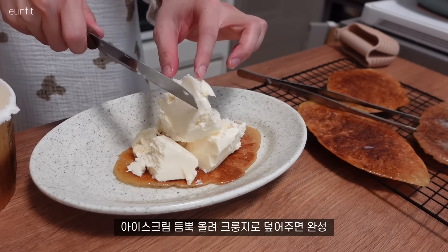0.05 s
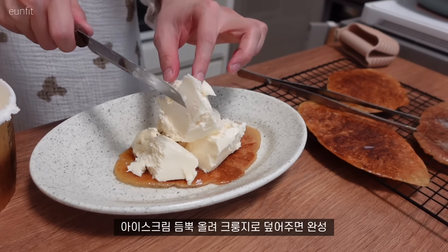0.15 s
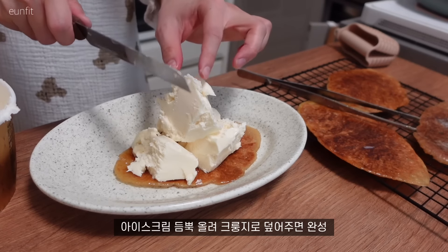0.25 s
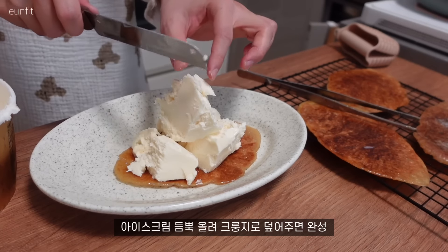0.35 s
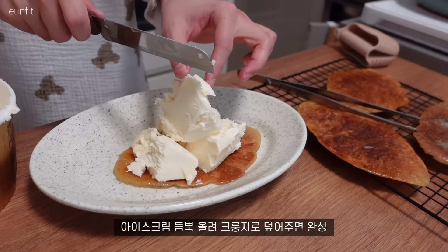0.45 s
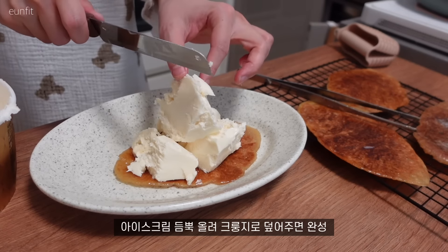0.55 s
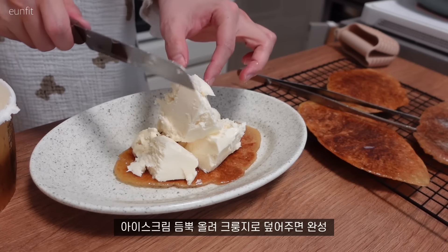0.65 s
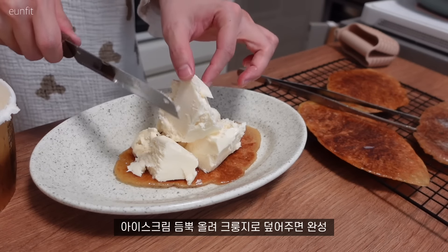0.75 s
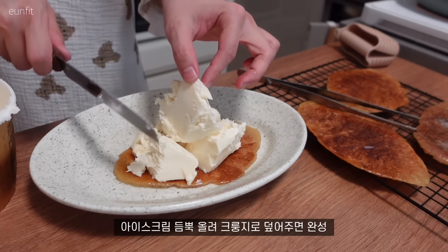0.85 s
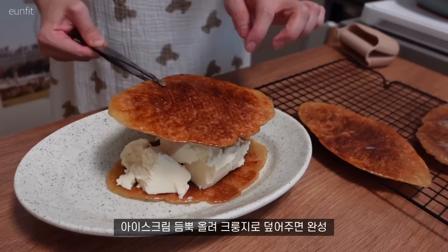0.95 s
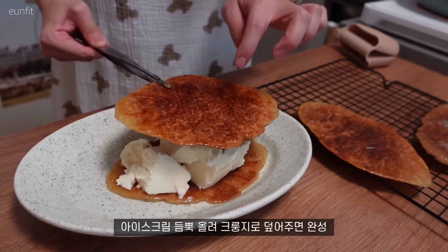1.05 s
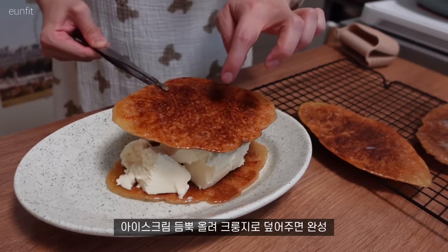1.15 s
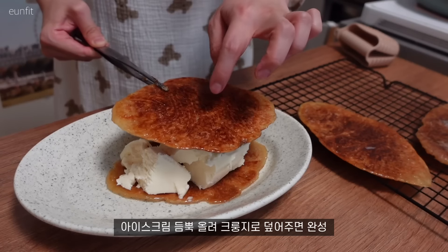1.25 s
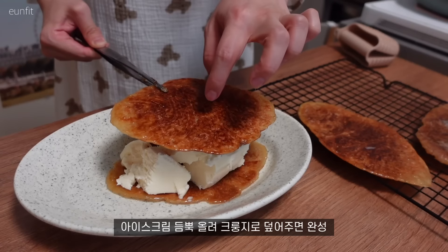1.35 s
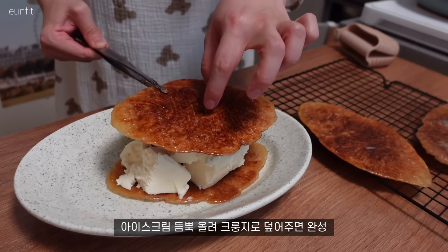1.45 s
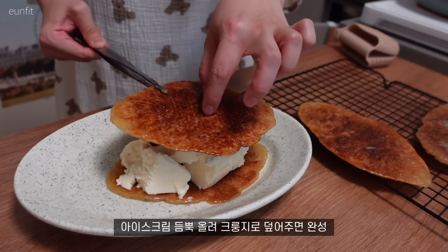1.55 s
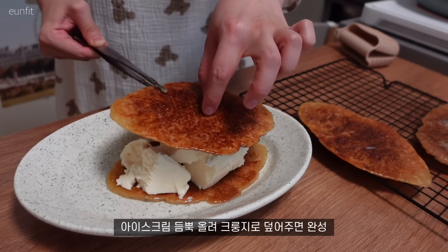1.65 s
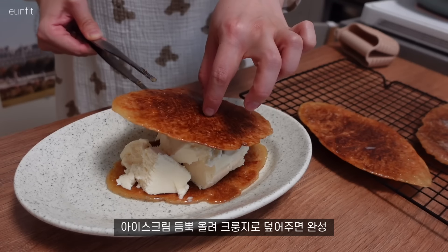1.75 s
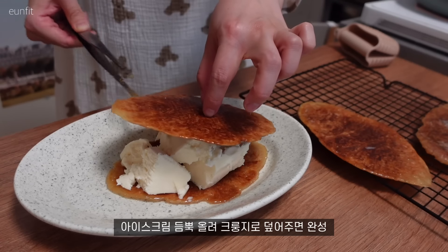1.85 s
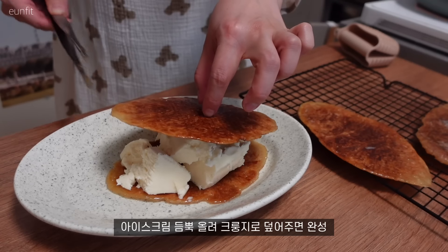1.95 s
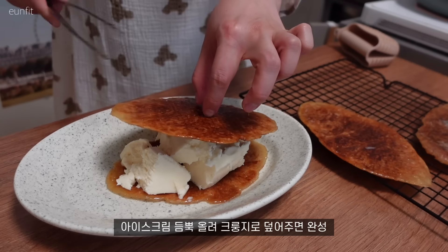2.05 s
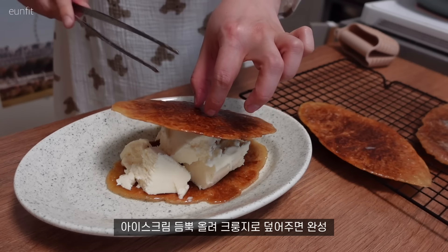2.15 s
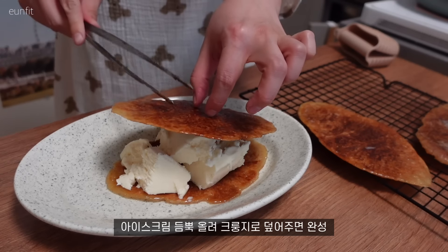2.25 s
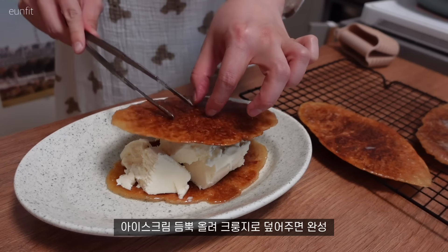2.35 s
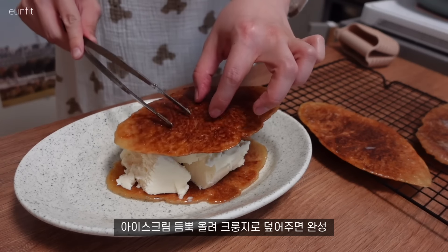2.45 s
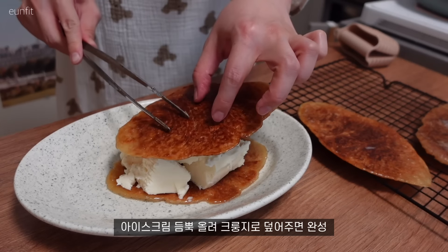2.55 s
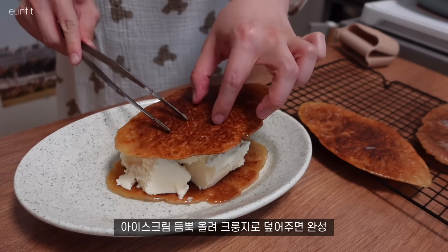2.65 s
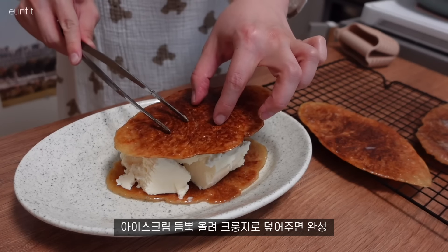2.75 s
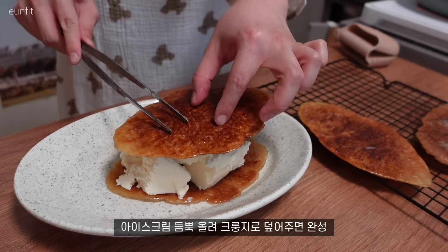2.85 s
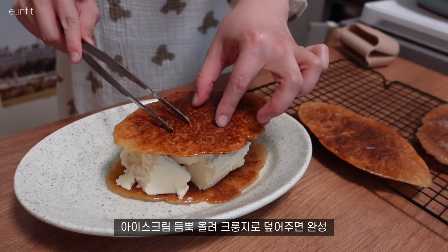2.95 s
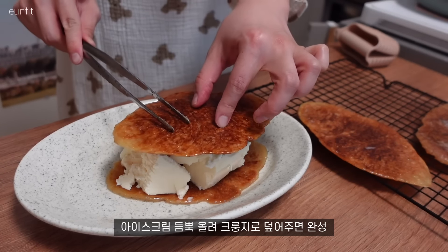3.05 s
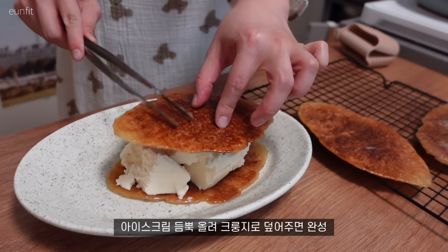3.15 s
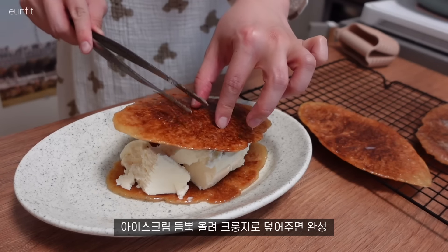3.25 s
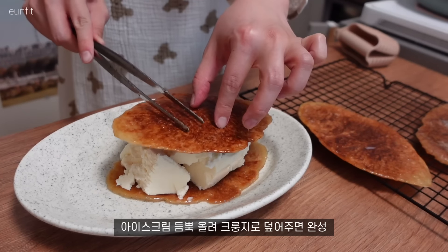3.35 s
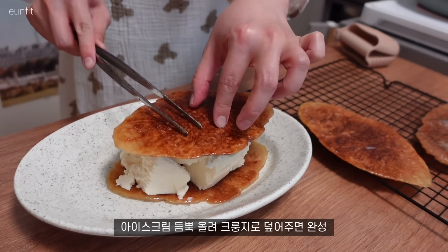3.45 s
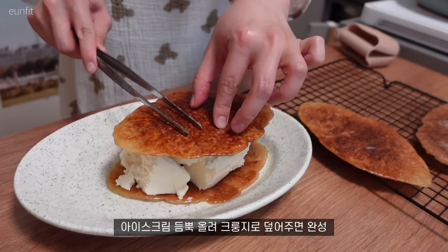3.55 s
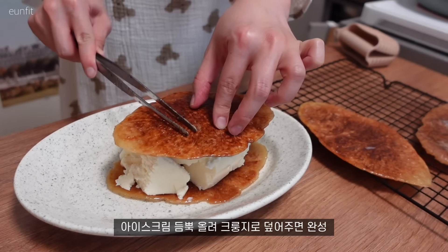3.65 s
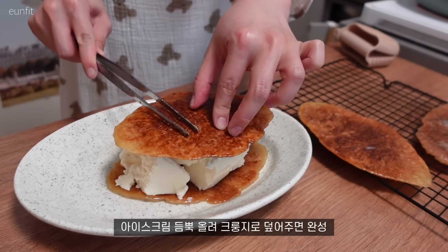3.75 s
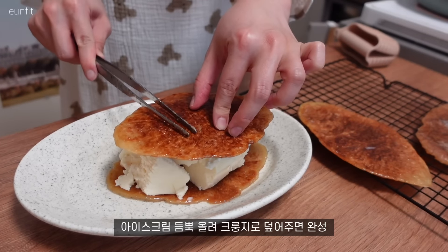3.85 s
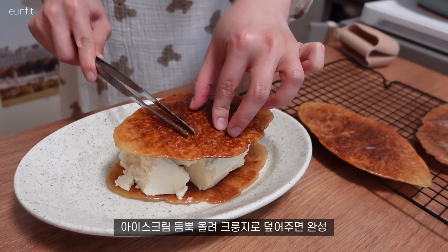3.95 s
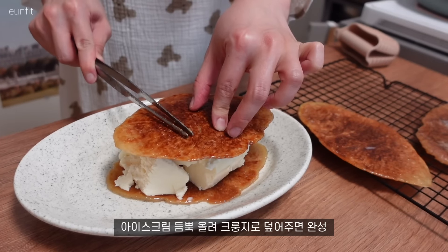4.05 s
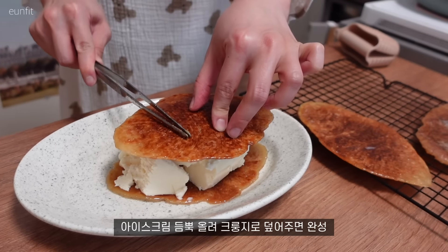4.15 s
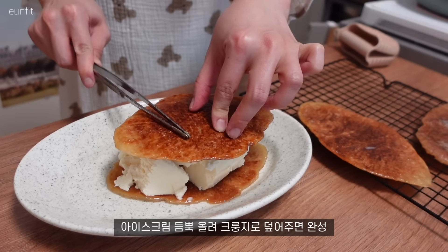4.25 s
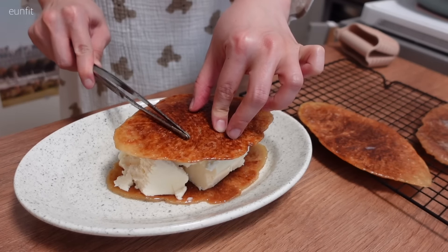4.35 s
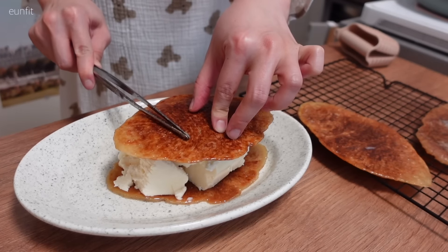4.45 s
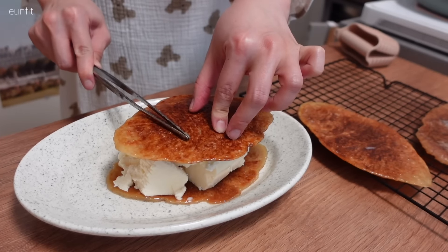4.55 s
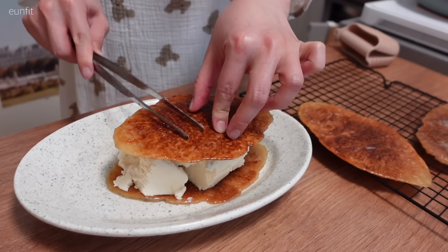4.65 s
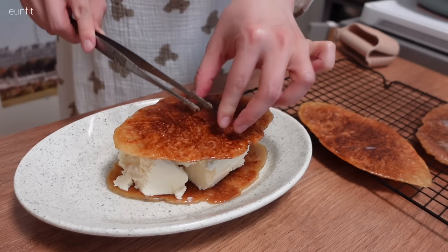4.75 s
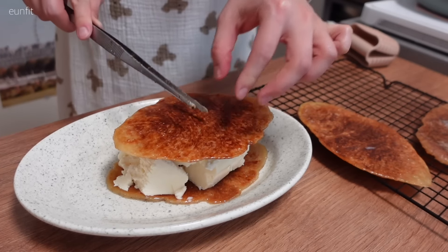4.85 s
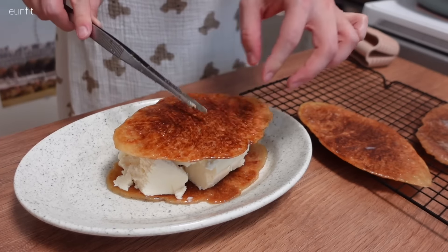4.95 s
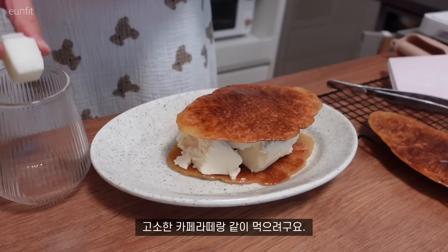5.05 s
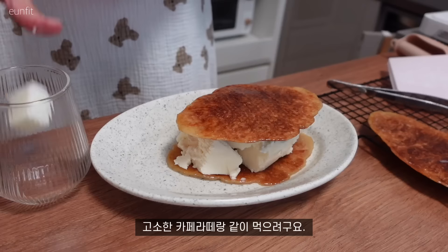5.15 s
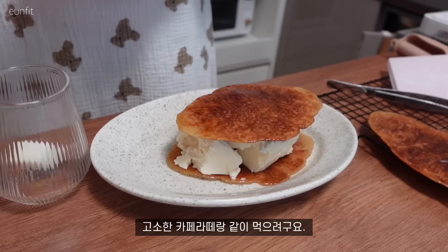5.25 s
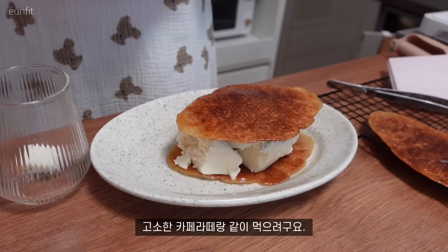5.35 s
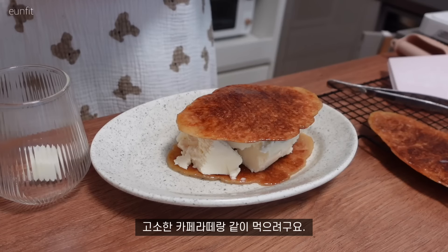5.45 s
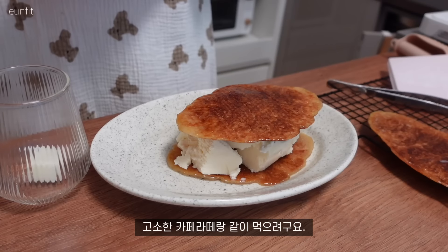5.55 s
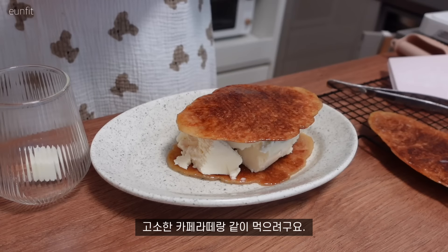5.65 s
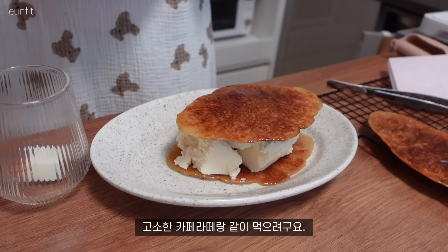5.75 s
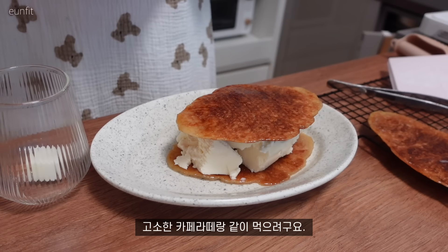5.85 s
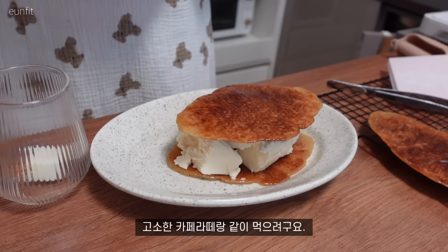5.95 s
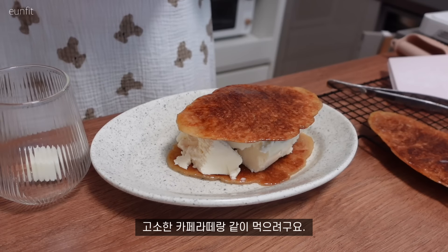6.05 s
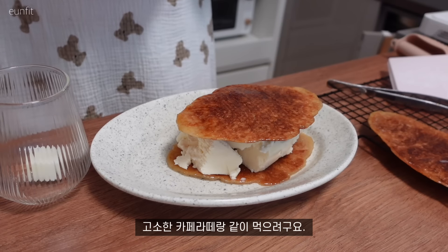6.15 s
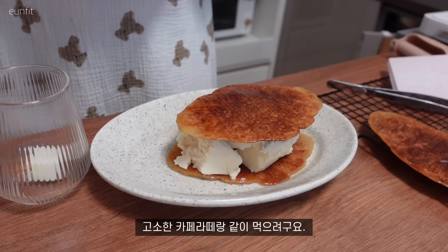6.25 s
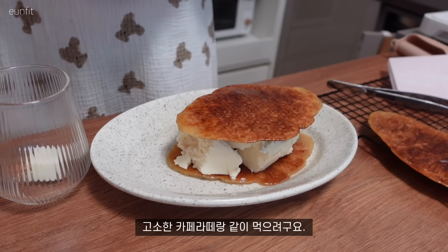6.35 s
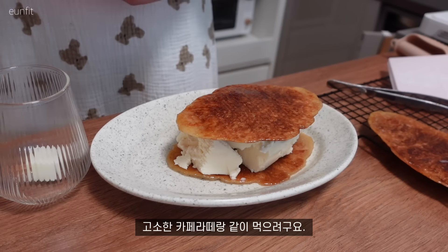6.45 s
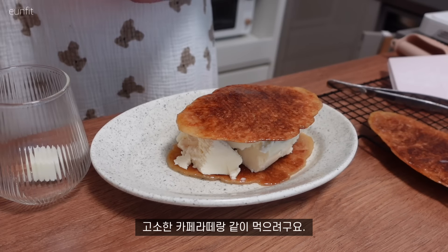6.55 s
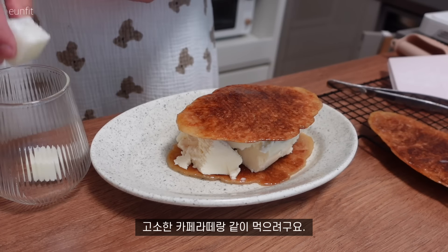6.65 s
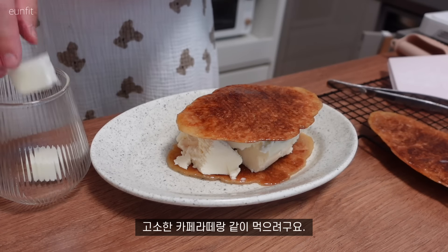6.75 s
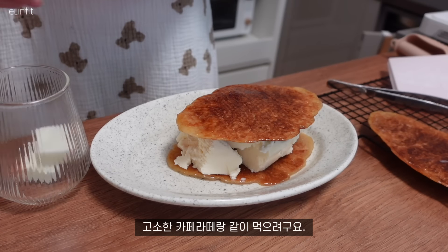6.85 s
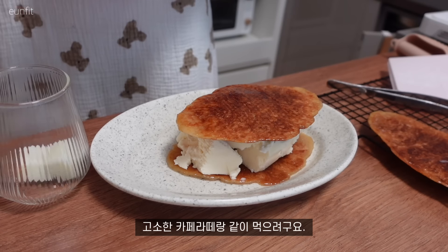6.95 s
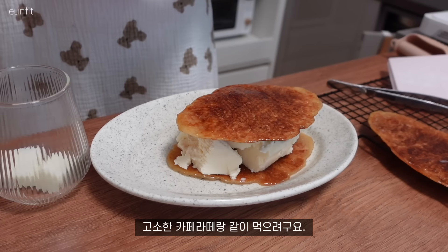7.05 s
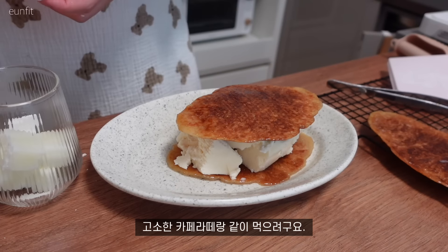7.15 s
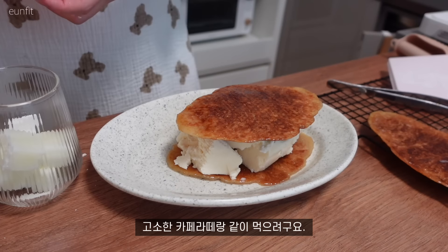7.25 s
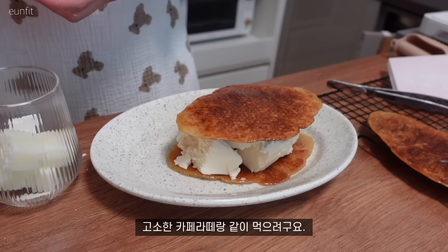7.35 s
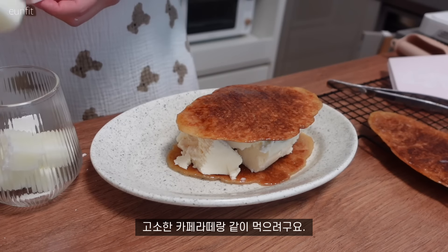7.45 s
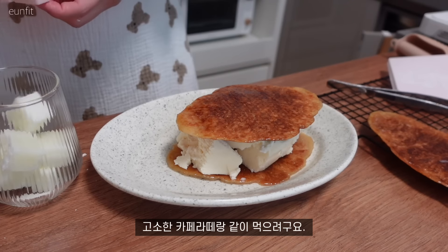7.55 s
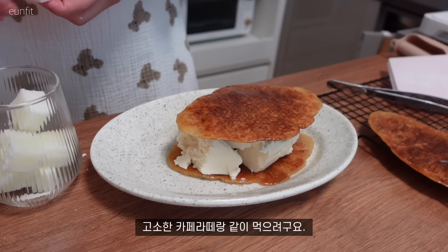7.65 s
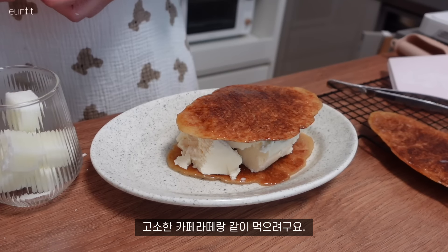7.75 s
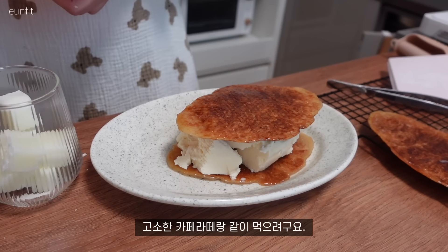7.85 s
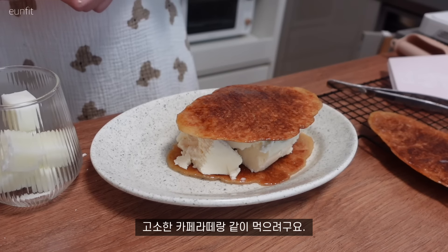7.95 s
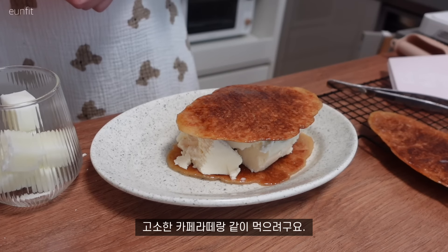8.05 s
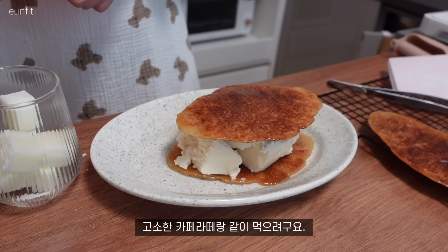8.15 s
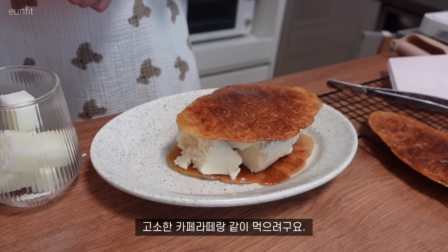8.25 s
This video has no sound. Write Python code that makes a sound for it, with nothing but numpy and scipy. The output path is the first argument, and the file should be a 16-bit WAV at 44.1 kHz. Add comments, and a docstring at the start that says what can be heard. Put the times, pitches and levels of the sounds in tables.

```python
"""First comes the low, steady noise of a small kitchen, and hands rubbing softly. Tongs and fingers tap
a crisp pastry lid and press it onto ice cream; its crust crackles as flakes break. Then three frozen
cubes are prised from a creaking tray and dropped into a thin glass on a wooden table. Each blow knocks
the table and rings the glass; a limiter squashes the hardest, so the room swells up behind them.
Just before the third cube, the ringing stops dead."""
import sys
import numpy as np
from scipy import signal
from scipy.fft import rfft, irfft, next_fast_len
from scipy.io import wavfile
from scipy.ndimage import uniform_filter1d

SR = 44100
rng = np.random.default_rng(int(sys.argv[2]) if len(sys.argv) > 2 else 0)


def waveform_to_disk(signal):
    """Save audio, clipped to [-1, 1], as 16-bit WAV at the path in sys.argv[1]."""
    frames = np.transpose(np.atleast_2d(signal))
    scaled = np.clip(frames, -1, 1) * 32767
    samples = np.round(scaled).astype(np.int16)
    wavfile.write(sys.argv[1], SR, samples)


N = 366030
FREQS = np.fft.rfftfreq(2048, 1 / SR) + 1  # a click's "colour" is its strength at each of these, in Hz


def amp(db):
    """Turns decibels into a gain; the levels in the tables are all relative."""
    return 10 ** (np.asarray(db) / 20)


def unit(x):
    """Scales a signal to an average power of 1."""
    return x / np.sqrt(np.mean(x ** 2) + 1e-20)


def read(points, hz):
    """Reads between the rows of a (frequency, value) table, on a pitch scale."""
    f, value = np.transpose(points)
    return np.interp(np.log(hz + 1), np.log(f + 1), value)


def add(mix, s, sound):
    """Mixes a sound in, starting at s seconds."""
    part = mix[max(round(s * SR), 0):][:len(sound)]
    part += sound[:len(part)]


def hump(hz, centre_hz, octaves):
    """A resonance: strongest at its centre, fading gently to both sides."""
    return (1 + (np.log2((hz + 1) / centre_hz) / octaves) ** 2 / 4) ** -3


def noise(colour, size):
    """Noise whose strength at each frequency follows the function colour(hz)."""
    white = rfft(rng.standard_normal(size))
    return unit(irfft(white * colour(np.fft.rfftfreq(size, 1 / SR)), size))


def click(colour, grit, grit_s):
    """A sudden pulse of the given colour, trailed by tiny fractures (the grit)."""
    log_gain = np.log(np.maximum(colour / colour.max(), 1e-5))
    mirrored = np.r_[log_gain, log_gain[-2:0:-1]]
    pulse = np.fft.ifft(np.exp(np.conj(signal.hilbert(mirrored)))).real  # packs the energy at the start
    fractures = rng.standard_normal(len(pulse)) * np.exp(-np.arange(len(pulse)) / SR / grit_s)
    pulse = pulse + grit * signal.fftconvolve(pulse, fractures / np.linalg.norm(fractures))[:len(pulse)]
    return pulse / np.linalg.norm(pulse) * np.sqrt(.002 * SR)  # the energy of 2 ms at power 1


# the steady noise of the room: f/Hz, level/dB
ROOM_NOISE = [(15, -67.5), (25, -35.5), (102, -15), (161, -4), (229, -7), (256, -4.5), (354, -6.5),
              (591, -17), (641, -16.5), (988, -21), (1260, -19.5), (1400, -21), (1790, -22.5), (6210, -33),
              (16000, -34)]
# how much left and right differ, next to what they share: f/Hz, level/dB
ROOM_WIDTH = [(60, -5), (150, -9), (380, -8.5), (950, -4.5), (2380, -6), (5980, -7), (15000, -25)]
def room_noise(level_db=-59.5):
    """A low, steady noise under a faint hiss."""
    mid, side = (noise(lambda hz: amp(read(ROOM_NOISE, hz)), N) for _ in range(2))
    width = amp(read(ROOM_WIDTH, np.fft.rfftfreq(N, 1 / SR)))
    side = irfft(rfft(side) * width, N)
    return amp(level_db) * (mid + np.array([side, -side]))


# hands rubbing and shifting: middle t/s, quarter of the length t/s, level/dB, centre f/Hz
RUBS = [(1.15, 0.16, -66.5, 1390), (1.122, .13, -74.5, 6500), (1.14, 0.039, -53.5, 117.5),
        (1.858, 0.037, -52, 810), (2.615, 0.07, -63.5, 1770), (3.659, 0.061, -62, 3100),
        (4.72, 0.042, -53.5, 3900), (5.908, 0.17, -63.5, 1554), (6.201, 0.045, -55.5, 2430),
        (6.465, 0.21, -62, 1470), (7.25, 0.13, -62, 1750)]
def hands(grain_db=3.5):
    """Each movement is a swell of grainy friction."""
    out = np.zeros(N)
    for s, quarter, db, centre_hz in RUBS:
        size = next_fast_len(int(4 * quarter * SR))
        grains = amp(grain_db * unit(uniform_filter1d(rng.standard_normal(size), size=150)))
        rub = unit(grains * noise(lambda hz: hump(hz, centre_hz, octaves=0.99), size))
        add(out, s - 2 * quarter, amp(db) * rub * np.hanning(size))
    return out


# how long the kitchen takes to fade by 60 dB: f/Hz, t/s
ROOM_FADE = [(150, 0.36), (500, 0.41), (1400, 0.52), (3500, 0.4), (8000, 0.44), (15000, 0.22)]
# echoes off nearby surfaces: delay t/s, gain
ECHOES = [(.0009, 0.058), (.0034, 0.15), (0.0172, 0.1), (0.0155, 0.057), (.0185, .14), (0.031, 0.39)]
def kitchen(x, wet_db, side_db, build_s=0.0059, apart_hz=600):
    """Adds a few early echoes and a smooth tail; left and right differ mainly in its treble."""
    hz, t, spectra = signal.stft(rng.standard_normal((2, 32768)), SR, nperseg=256)
    decay = amp(-60 * t / read(ROOM_FADE, hz)[:, None])
    tails = signal.istft(spectra * decay, SR, nperseg=256)[1]
    tails *= 1 - np.exp(-(np.arange(tails.shape[1]) / SR / build_s) ** 2)
    mid, side = amp(wet_db) * tails / np.linalg.norm(tails[0])
    side = signal.sosfilt(signal.butter(1, apart_hz, "high", fs=SR, output="sos"), side)
    mid[0] += 1  # the direct sound
    for delay, gain in ECHOES:
        mid[round(delay * SR)] += gain * amp(wet_db)
    response = mid + amp(side_db) * np.array([side, -side])
    return signal.fftconvolve(x[None], response, axes=1)[:, :N]


def contact(hz, hardness_hz, slope=1.966):
    """A soft contact lasts longer, so it makes less treble."""
    return 1 / np.sqrt(1 + (hz / hardness_hz) ** (2 * slope))


def snaps(rows, body, level_db, grit, grit_s, crumb_db, crumb_s, edge=0.058, crumbs=4, ripple_db=1.5):
    """Brittle clicks that do not ring, each followed by a few much smaller fractures."""
    out = np.zeros(N)
    for s, db, hz, octaves in rows:
        # each spot has its own hollow resonances
        ripple = np.c_[np.geomspace(500, 16000, 26), rng.standard_normal(26)]
        colour = hump(FREQS, hz, octaves) * amp(read(body, FREQS) + ripple_db * read(ripple, FREQS))
        colour *= contact(edge * hz, FREQS)  # a small piece gives off little sound below edge * hz
        add(out, s, amp(db + level_db) * click(colour, grit, grit_s))
        for lag, size in rng.standard_normal((crumbs, 2)):
            crumb = amp(db + crumb_db + 0.91 * size) * click(colour, grit, grit_s)
            add(out, s + crumb_s * (1 + 0.17 * lag), crumb)
    return out


# taps on the lid: t/s, level/dB, centre f/Hz, spread/octaves
TAPS = [(1.8452, -44, 750, 1.4), (1.8804, -40, 1190, 1.63), (2.347, -35.5, 1280, 0.93),
        (2.869, -53, 1730, 1.6), (3.3679, -36.5, 1390, 0.78)]
# the tone of the lid on its plate: f/Hz, level/dB
LID_TONE = [(400, -8), (680, 2.5), (950, 1), (1500, 2.5), (2100, -4), (2900, 1), (4300, -5), (6500, 5.5),
            (9000, 2), (16000, 3)]
def lid_taps():
    """Tongs and fingers make dull taps on the pastry."""
    return snaps(TAPS, LID_TONE, level_db=4.0, grit=1.15, grit_s=0.0022, crumb_db=-14.5, crumb_s=.018)


# single cracks: t/s, level/dB, centre f/Hz
CRACKS = [(3.2683, -41.5, 2880), (3.634, -44.5, 2590), (3.656, -45, 6100), (3.8257, -45.5, 4460),
          (3.9282, -44, 6000), (4.1483, -45, 8300), (4.2056, -37, 4430), (4.362, -38, 7000),
          (4.4758, -40, 7000), (4.5, -51, 5600), (4.6246, -45.5, 2200), (4.6699, -43.5, 4830),
          (4.7294, -33.5, 2970), (4.7662, -37, 1970), (4.7751, -31, 11000)]
# runs of small flakes giving way: start t/s, end t/s, level/dB
CRUMBLES = [(3.623, 3.982, -55), (4.492, 4.548, -53), (4.69, 4.755, -45)]
# the tone that all the cracks share: f/Hz, level/dB
FLAKE_TONE = [(500, -9.5), (1400, 3), (2300, 2.5), (3100, 4.5), (4200, -1), (5200, 0.5), (6400, -3.5),
              (7800, 0.5), (10000, -1.5), (13000, 1), (16000, -2.5)]
def crust_cracks(per_run=6, flake_hz=5200, pitch_octaves=0.86, spread_db=6.5, width_octaves=1.5):
    """The crust cracks and sheds flakes at uneven intervals, each with its own loudness and pitch."""
    breaks = list(CRACKS)
    for start, end, db in CRUMBLES:
        for k, (when, size, pitch) in enumerate(rng.uniform(-0.9, 1, (per_run, 3))):
            s = start + (end - start) * (k + .5 + .5 * when) / per_run
            breaks.append((s, db + spread_db * size, flake_hz * 2 ** (pitch_octaves * pitch)))
    rows = [(s, db, hz, width_octaves) for s, db, hz in breaks]
    return snaps(rows, FLAKE_TONE, level_db=2.0, grit=1.2, grit_s=0.0021,
                 crumb_db=-27.5, crumb_s=.016, edge=0.59)


def crust_crunch(start_s=3.58, end_s=4.8, count=60, level_db=-61, spread_db=4.0):
    """Under a firm, steady press, tiny flakes keep giving way."""
    when, pitch = rng.random((2, count))
    levels = level_db + spread_db * np.clip(rng.standard_normal(count), -2, 2)
    out = np.zeros(N)
    for s, db, hz in zip(start_s + (end_s - start_s) * when, levels, 3500 * 3 ** pitch):
        add(out, s, amp(db) * click(hump(FREQS, hz, octaves=0.98), grit=1, grit_s=0.0013))
    return out


def ring(hz, fade_s, gains, size, waver=0, rise_s=0.0011):
    """A struck object's own tones: each falls 60 dB in fade_s and may waver in level and phase."""
    t = np.arange(size) / SR
    steps = rng.standard_normal((len(hz), size // 200 + 2, 2)) @ [1, 1j]
    drift = np.array([np.interp(t * SR / 200, np.arange(len(row)), row) for row in steps])
    tones = np.exp(2j * np.pi * hz[:, None] * t) * amp(-60 * t / fade_s[:, None])
    tones *= 1 + np.reshape(waver, (-1, 1)) * drift
    return gains @ tones * (1 - np.exp(-t / rise_s))


# the tones of the wooden table: f/Hz, fade t/s, level/dB
WOOD_TONES = [(186.2, 0.16, -11.5), (225, 0.062, -19), (273, 0.079, -18.5), (337, 0.098, -18),
              (558, 0.023, -14.5), (629, 0.075, -12), (657, .12, -12), (790, 0.086, -21.5),
              (1430, .05, -19), (1598, 0.22, -22.5), (2141, .03, -7), (2030, 0.053, -23)]
def table_thuds(hardness_hz, level_db=-1):
    """Each blow shakes the table under the glass, giving one short thud."""
    hz, fade_s, db = np.transpose(WOOD_TONES)
    signs = (-1) ** np.arange(len(hz))  # neighbouring tones swing in opposite directions
    return ring(hz, fade_s, signs * amp(db + level_db) * contact(hz, hardness_hz), size=16000).imag


# the tones of the glass: f/Hz, fade t/s, level/dB if hit on the base, level/dB if hit on the wall
GLASS_TONES = [(1279.6, 2.1, -39, -19), (3368, 0.32, -33.5, -10.5), (3388, 0.38, -41, -4),
               (5330, .2, -12.5, -48), (5570, 0.16, -1, -38), (5644, 0.22, -1, -33.5),
               (5595, .2, -7, -35.5), (5860, 0.31, -17, -23), (7240, 0.11, -30.5, -6.5),
               (8300, 0.14, -40, -10.5), (8845, 0.21, -19, -18.5), (10580, 0.22, -10.5, -32),
               (11020, 0.15, -35.5, -16), (11430, 0.16, -45.5, -21.5), (12850, .12, -37.5, -15.5),
               (13260, .21, -24, -20), (13490, 0.17, -24.5, -26), (14200, .12, -29, -18.5),
               (15000, .1, -29, -21.5)]
def glass_tones(base_db, wall_db, tilt_db):
    """Where a cube lands decides which tones sound: gives each blow's ring, rasp gain and colour."""
    hz, fade_s, on_base, on_wall = np.transpose(GLASS_TONES)
    tilt = tilt_db * np.log2(np.maximum(hz, 3400) / 5000)
    base, wall = amp(base_db + on_base + tilt), amp(wall_db + on_wall + tilt)
    waver = 0.35 * np.minimum(hz / 5500, 1) ** 3  # the loose cube disturbs the high tones most
    rings = ring(hz, fade_s, np.hypot(base, wall), size=70000, waver=waver)
    # a cube chatters on the base, smearing the tones into a rasp; it glances off the wall more cleanly
    rasp = np.hypot(base * amp(-7), wall * amp(-14))
    smeared = np.sqrt(rasp ** 2 @ hump(FREQS, hz[:, None], octaves=0.07) ** 2)
    return rings, np.linalg.norm(rasp, axis=1), smeared * (1 - contact(FREQS, 7800))


# the tone of ice hitting glass: f/Hz, level/dB
CLACK_TONE = [(30, -46), (100, -35), (180, -3.5), (470, -5), (680, 6.5), (1000, -2), (1600, 2), (2350, 0),
              (2900, -7), (4000, -4.5), (5300, 3), (8500, 3.5), (12000, -13.5), (16000, -21.5)]
def ice_clack(hardness_hz, level_db=-1):
    """A dry, gritty clack, brighter when the contact is harder."""
    colour = amp(read(CLACK_TONE, FREQS)) * contact(FREQS, hardness_hz)
    return amp(level_db) * click(colour, grit=3.6, grit_s=0.0035)


def struck_glass(blows, phase_rad=0.33):
    """Each blow clacks, thuds and rasps in the room; the ring is a little out of step left and right."""
    knocks, chime = np.zeros(N), np.zeros(N, complex)
    s, knock_db, hardness_hz, base_db, wall_db, tilt_db = np.transpose(blows)[:, :, None]
    thuds = table_thuds(hardness_hz)
    rings, rasp_gains, rasp_colours = glass_tones(base_db, wall_db, tilt_db)
    for k, at in enumerate(s[:, 0]):
        add(knocks, at, amp(knock_db[k]) * ice_clack(hardness_hz[k]))
        add(knocks, at, amp(knock_db[k]) * thuds[k])
        add(knocks, at, rasp_gains[k] * click(rasp_colours[k], grit=7.9, grit_s=0.0071))
        add(chime, at, rings[k])
    ringing = (chime * np.exp(1j * phase_rad * np.array([[1], [-1]]))).imag
    return ringing + kitchen(knocks, wet_db=-4, side_db=-15.0)


# cubes hitting the glass: t/s, knock level/dB, hardness f/Hz, base ring level/dB, wall ring level/dB,
# treble tilt/(dB per octave)
BLOWS = [(5.2578, 0.5, 4100, 3.5, -42, -3.5), (5.297, -7, 1240, -15.5, -55, -4),
         (5.3444, -17, 980, -17.5, -50, -11), (5.4997, -9, 7030, -26.5, -36, 12.5),
         (6.8177, -25.5, 900, -62, -24, -2), (6.877, 1, 1550, -54, -28.5, -5),
         (6.9418, -7.5, 598, -45, -11.5, 3.5), (7.0895, -14.5, 1147, -44, -38.5, 0),
         (7.5986, -33.5, 2480, -52, -49.5, 9.5), (7.6027, -17.5, 1420, -59, -52, 2),
         (7.6315, -50, 1516, -54, -38, 9), (7.8427, -43, 1476, -54.5, -49, -3)]
# cubes rocking to rest: first knock t/s, gap t/s, level/dB, change per knock/dB
ROCKING = [(5.544, 0.041, -17, -7), (7.635, 0.048, -25, -5), (7.934, .102, -42, -3)]
def falling_cubes(stop_s=7.136, rocks=3, rock_hardness_hz=580, rock_ring_db=-33):
    """Cubes land, then rock in soft, even, fading knocks that hardly ring the glass."""
    blows = list(BLOWS)
    for s, gap_s, first_db, step_db in ROCKING:
        for k in range(rocks):
            db = first_db + k * step_db
            blows.append((s + k * gap_s, db, rock_hardness_hz, db + rock_ring_db, db + rock_ring_db, 0))
    first_two = struck_glass([blow for blow in blows if blow[0] < stop_s])
    third = struck_glass([blow for blow in blows if blow[0] >= stop_s])
    gate = np.clip((stop_s - np.arange(N) / SR) / .001, 0, 1)  # the ringing stops dead at stop_s
    return gate * first_two + third


# creaks of the tray: t/s, level/dB, centre f/Hz, spread/octaves
CREAKS = [(6.1781, -40, 4960, 2.5), (6.2228, -37.5, 1780, 1), (6.2276, -38.5, 5660, 2.1),
          (6.232, -31, 12170, 1.6), (6.4015, -40.5, 1710, 1.1), (6.4251, -38, 1790, 0.93),
          (6.6456, -50, 1220, 1.9)]
# the tone of the hollow tray: f/Hz, level/dB
TRAY_TONE = [(600, -5), (1650, 1.5), (2400, 1), (3500, -12.5), (5500, -5.5), (6600, -2), (9500, -5),
             (11800, 2), (13000, 0), (16000, -7)]
def tray_creaks():
    """The tray creaks and snaps as it lets a cube go."""
    return snaps(CREAKS, TRAY_TONE, level_db=1.5, grit=1.0, grit_s=0.0035, crumb_db=-19.5, crumb_s=0.027)


def scene(bass_cut_hz=135):
    """All the action in the kitchen, with its deep bass removed, over the room noise."""
    cubes = falling_cubes()
    handling = lid_taps() + crust_cracks() + crust_crunch() + tray_creaks() + hands()
    action = cubes + kitchen(handling, wet_db=-8.5, side_db=-13.0)
    action = signal.sosfilt(signal.butter(4, bass_cut_hz, "high", fs=SR, output="sos"), action)
    return (action + room_noise()) * amp([[.3], [-.3]])  # the left is a touch louder


def record(dry, limit_db=-15, release_s=0.028, top_hz=16300):
    """A limiter turns loud blows down at once and lets go smoothly; the highest treble is removed."""
    power_db = 10 * np.log10(abs(uniform_filter1d((dry ** 2).mean(0), size=180)) + 1e-12)
    over_db = np.maximum(power_db - limit_db, 1e-9)
    fall = np.arange(N) / SR / release_s
    cut_db = np.exp(np.maximum.accumulate(np.log(over_db) + fall) - fall)  # jumps up, then dies away
    limited = dry / amp(uniform_filter1d(cut_db, size=40))
    rounded = limited / (1 + (limited / .62) ** 6) ** (1 / 6)  # rounds off peaks that slip past
    low_pass = signal.firwin(255, top_hz, window=("kaiser", 9), fs=SR)
    return signal.oaconvolve(rounded, low_pass[None], "same")


dry = scene()
out = record(dry)
waveform_to_disk(out)
```